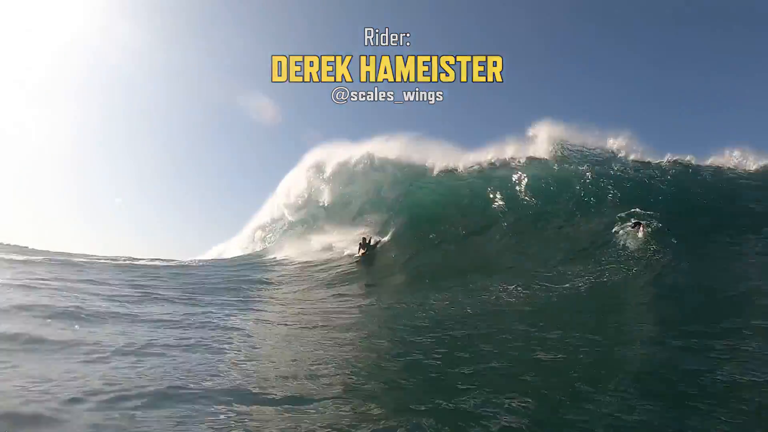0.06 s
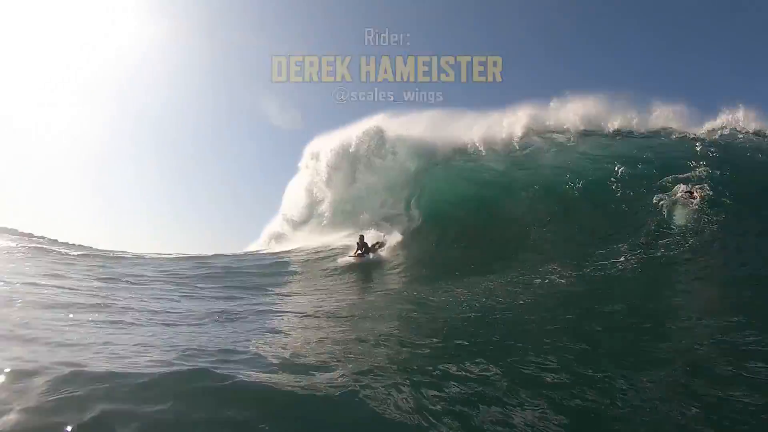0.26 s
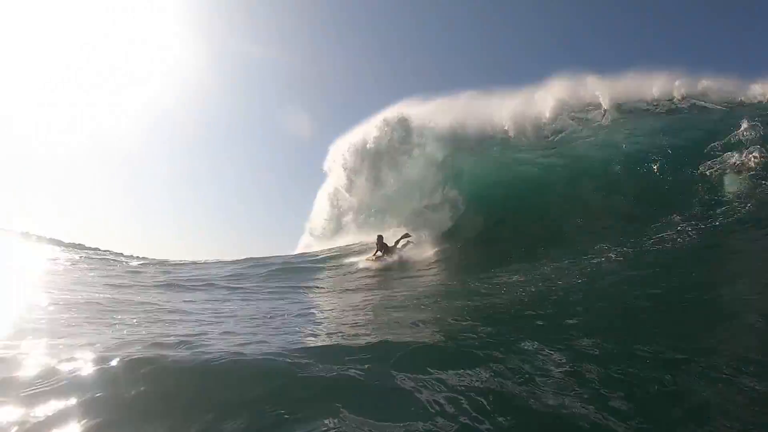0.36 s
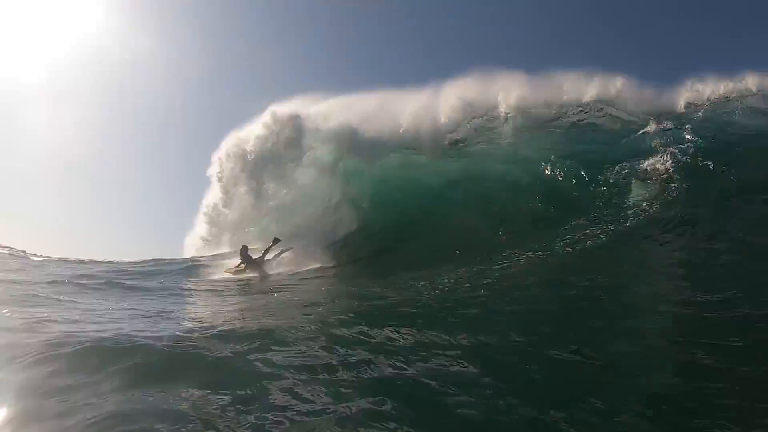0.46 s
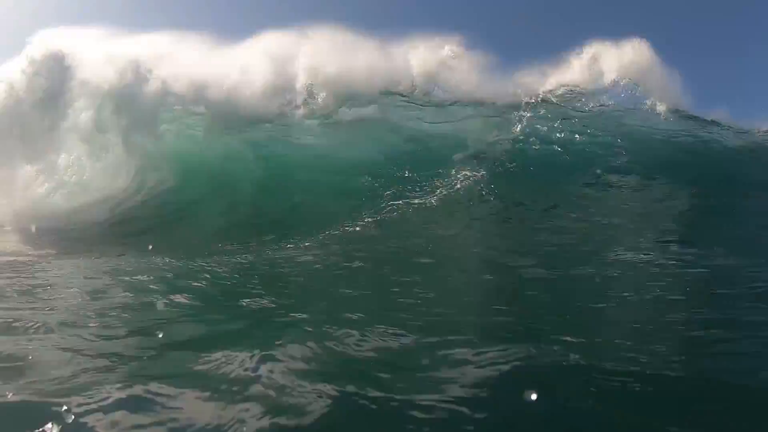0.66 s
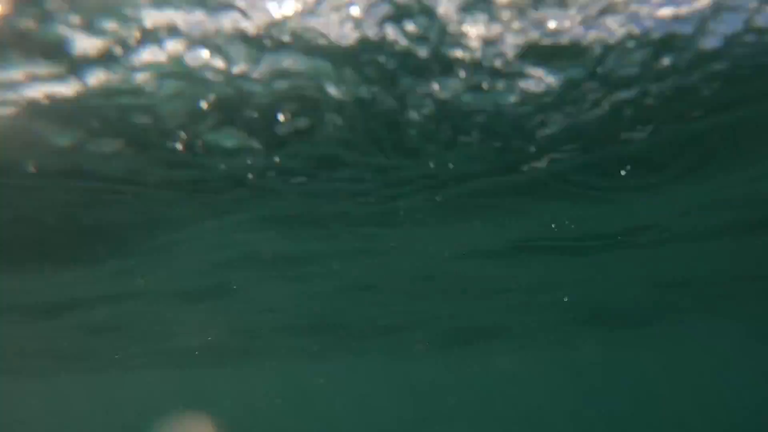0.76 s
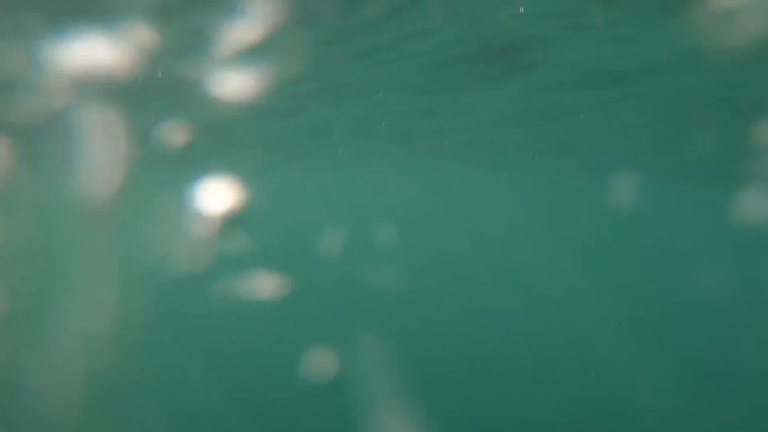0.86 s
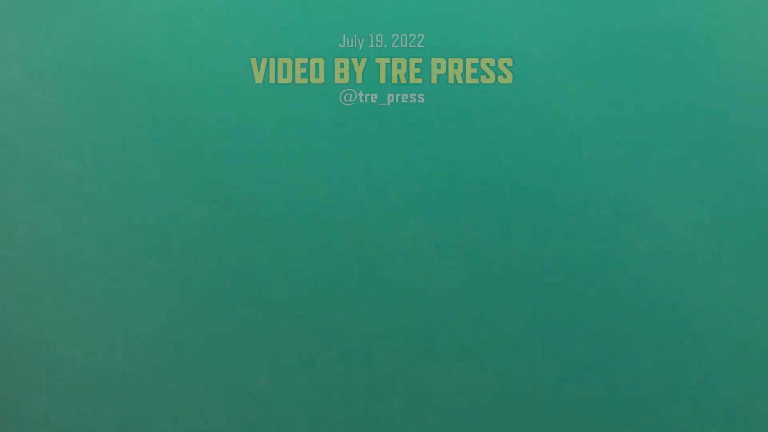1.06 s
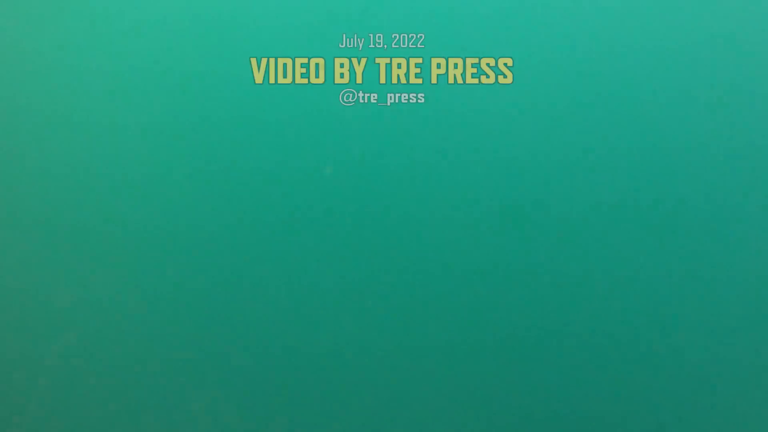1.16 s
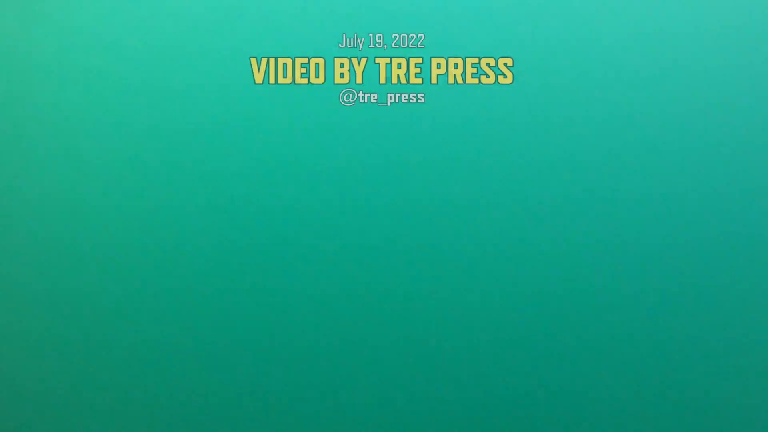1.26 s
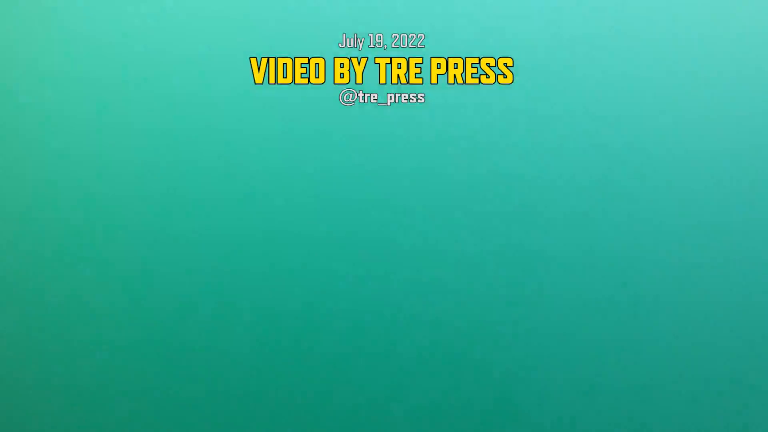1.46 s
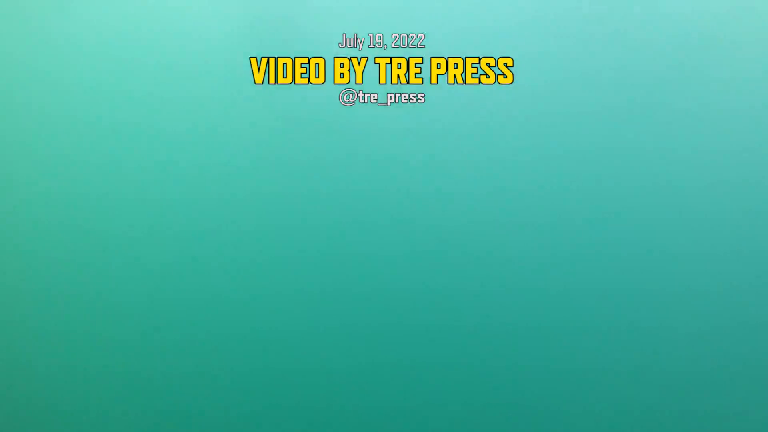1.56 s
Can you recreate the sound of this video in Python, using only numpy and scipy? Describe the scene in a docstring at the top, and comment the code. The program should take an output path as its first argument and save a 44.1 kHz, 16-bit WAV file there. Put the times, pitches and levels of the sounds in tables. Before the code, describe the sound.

Surf washes softly toward a microphone bobbing in the sea, until a close splash takes it underwater. Gurgling, fizzing bubbles and a low throbbing follow, fading to a dull rumble with a few small ticks.

```python
"""First a wave breaks some way off, heard from a waterproof camera at the surface that water rocks.
A nearer wash swells, its foam and hollow resonances sounding together. At 0.8 s the camera plunges:
spray sets the case ringing and the water closes with a slap. Entrained air then streams past as
oscillating bubbles, while shed eddies throb in a low tone that rises and falls.
A last glug follows at 1.3 s, then a muffled rumble with a few ticks of small bubbles."""
import sys
import numpy as np
from scipy import signal
from scipy.fft import rfft, irfft
from scipy.io import wavfile
from scipy.ndimage import uniform_filter1d

SR = 44100
rng = np.random.default_rng(int(sys.argv[2]) if len(sys.argv) > 2 else 0)


def output_pcm(signal):
    """Save a mono or channel-first signal as 16-bit PCM at the path in sys.argv[1].

    Samples are clipped to [-1, 1] before scaling.
    """
    pcm = np.clip(np.atleast_2d(signal).T, -1, 1) * 32767
    wavfile.write(sys.argv[1], SR, np.round(pcm).astype(np.int16))


N = 70560
T = np.arange(N) / SR


def undb(db):
    """Amplitude ratio of a level in decibels."""
    return 10 ** (np.asarray(db) / 20)


def unit(x):
    """Normalisation to rms 1."""
    return x / np.sqrt(np.mean(x ** 2))


def curve(table, column=1):
    """Linear interpolation of one column in time."""
    rows = np.array(table)
    return np.interp(T, rows[:, 0], rows[:, column])


def during(table):
    """A time window over a table's span, with 20 ms fades outside."""
    return np.clip(1 + np.minimum(T - table[0][0], table[-1][0] - T) / .02, 0, 1)


def colour(x, spectrum):
    """Spectral shaping by rows of f/Hz, level/dB; rms 1."""
    hz, db = np.array(spectrum).T
    f = np.maximum(np.fft.rfftfreq(N, 1 / SR), 1)
    skirts = np.minimum(f / hz[0], 1) ** 2 * np.minimum(hz[-1] / f, 1) ** 4
    gain = undb(np.interp(np.log(f), np.log(hz), db))
    return unit(irfft(rfft(x) * skirts * gain, N))


def walk(rate):
    """Random modulation: values held 1 / rate s and smoothed twice; rms 1."""
    hold = int(SR / rate)
    steps = np.repeat(rng.standard_normal(N // hold + 1), hold)
    return unit(uniform_filter1d(uniform_filter1d(steps, hold), hold)[:N])


def add(out, start, sound):
    """Superposition of a sound from a start time in seconds."""
    i = int(np.clip(start * SR, 0, N - 1))
    out[i:i + len(sound)] += sound[:N - i]


def ring(hz, t60, attack_s, glide=0):
    """A damped oscillator whose frequency climbs by the fraction glide."""
    t = np.arange(int(t60 * SR) + 2) / SR
    envelope = (1 - np.exp(-t / attack_s)) * np.exp(-np.log(1000) * t / t60)
    return envelope * np.sin(2 * np.pi * hz * t * (1 + glide * t / t60 / 2))


def resonance(hz, width_hz):
    """A resonator driven by turbulence gives narrow-band noise; rms 1."""
    phase = 2 * np.pi * np.cumsum(hz * np.ones(N)) / SR
    return unit(walk(2 * width_hz) * np.sin(phase) + walk(2 * width_hz) * np.cos(phase))


def bubbles(per_s, low_hz, high_hz, cycles, scatter_db):
    """Bubbles pulsate at frequencies set by their size, many weakly and a few strongly; rms 1."""
    out = np.zeros(N)
    for when, size, strength, life in rng.random((12000, 4))[:int(per_s * N / SR)]:
        hz = low_hz * (high_hz / low_hz) ** size
        db = -scatter_db * np.log(max(strength, .02))
        blip = ring(hz, t60=cycles * (.5 + life) / hz, attack_s=.7 / hz, glide=.38)
        add(out, when * N / SR, hz * undb(db) * blip)  # weighting by hz flattens the spectrum
    return unit(out)


# Spectra of the spray and the slap: f/Hz, relative level/dB
SPRAY_SPECTRUM = [(100, 2.5), (320, 6), (600, -14), (900, -9), (1200, 6), (1700, -7), (2000, -6.5),
                  (2350, -12.5), (3200, -18.5), (4600, -11.5), (6500, -17.5), (8300, -25.5), (10500, -53),
                  (13000, -35), (16000, -45)]
SLAP_SPECTRUM = [(300, -1.5), (1000, 5), (1700, 8.5), (2800, -3), (5000, -17), (9000, -34)]
# Modes of the case: f/Hz, bandwidth/Hz, relative level/dB
CASE_MODES = [(1208, 50, -11), (2283, 60, -17)]
def splash():
    """Impact excitation: spray drives the modes of the case until the water closes with a slap."""
    entry_s, slap_rise_s = .807, .0011
    spray_start_s, spray_fade_s = .776, .017

    def swell(rise_db_s, fall_db_s=911):
        """Exponential growth up to the entry, then decay."""
        return undb(-12.5 + np.minimum(rise_db_s * (T - entry_s), fall_db_s * (entry_s - T)))

    drops = bubbles(6000, 112.5, 12800, cycles=6, scatter_db=2)
    spray = colour(drops + undb(.5) * rng.standard_normal(N), SPRAY_SPECTRUM)
    ringing = sum(undb(db) * resonance(hz, width) for hz, width, db in CASE_MODES)
    onset = np.clip((T - spray_start_s) / spray_fade_s, 0, 1)
    age = np.maximum(T - entry_s, 0) / slap_rise_s
    slap = colour(rng.standard_normal(N), SLAP_SPECTRUM) * age * np.exp(1 - age)
    return (spray * swell(760) + ringing * swell(453)) * onset + undb(-8.5) * slap


# Envelopes of the bubble cloud: t/s, gurgle level/dB, fizz level/dB
CLOUD_LEVELS = [(.8, -24.5, -63), (.835, -27, -68), (.86, -21, -37.5), (.895, -24, -39), (.92, -17.5, -34),
                (.96, -19.5, -35.5), (.99, -23.5, -36), (1.03, -28, -41.5), (1.075, -29.5, -51.5),
                (1.105, -23.5, -46.5), (1.16, -34.5, -47), (1.23, -33, -48), (1.3, -37.5, -61),
                (1.39, -43, -72.5), (1.44, -41, -74), (1.52, -49, -61), (1.6, -48.5, -72.5)]
# Spectra of its large and small bubbles: f/Hz, relative level/dB
GURGLE_SPECTRUM = [(150, -11.5), (260, -0.5), (430, 2.5), (700, 2.5), (950, -5), (1200, 0), (1450, -7.5),
                   (1700, -3.5), (2050, -26.5), (2800, -21.5), (3600, -36), (6000, -66)]
FIZZ_SPECTRUM = [(1800, 8.5), (2700, 3), (3400, -6), (4400, 5), (5200, 0.5), (6100, 6.5), (7000, -3.5),
                 (8400, -8), (10500, -38), (13000, -30), (16000, -33)]
def cloud():
    """Air entrainment: large bubbles gurgle and small ones fizz, in shared spurts."""
    large = bubbles(2700, 188.7, 3386, cycles=16.1, scatter_db=2)
    small = bubbles(1800, 2000, 14000, cycles=20, scatter_db=3.5)
    hiss = undb(2) * rng.standard_normal(N)
    gurgle = colour(large, GURGLE_SPECTRUM) * undb(curve(CLOUD_LEVELS))
    fizz = colour(small + hiss, FIZZ_SPECTRUM) * undb(curve(CLOUD_LEVELS, column=2))
    spurts = undb(1.35 * walk(80))
    return (gurgle + fizz) * spurts * during(CLOUD_LEVELS)


# Knocks of water and trapped air: t/s, f/Hz, level/dB, T60/s
AIR_POCKETS = [(0.209, 41.7, -14.5, 0.16), (.796, 158, -10.5, 0.086), (.81, 166.6, -6.5, 0.08),
               (0.81, 50, -2.5, 0.078), (.909, 352, -12, 0.083), (0.92, 205, -10.5, 0.059),
               (0.92, 85, -4.5, 0.057), (0.954, 66.7, -3, 0.075), (1.01, 63.6, -8.5, 0.11),
               (1.265, 204.6, -20, 0.096), (1.3, 157, -5.5, 0.059)]
def glugs():
    """Damped free oscillation: large air pockets and slaps of water boom briefly."""
    out = np.zeros(N)
    for start, hz, db, t60 in AIR_POCKETS:
        add(out, start, np.sqrt(2) * undb(db) * ring(hz, t60, attack_s=.0031))
    return out


# Tone of the flow past the case: t/s, f/Hz, level/dB
EDDY_TONE = [(.95, 92.3, -42), (1.03, 99.6, -19.5), (1.08, 114.5, -13), (1.105, 168.3, -20),
             (1.14, 201.1, -19), (1.19, 155.6, -18.5), (1.23, 121.6, -12), (1.265, 97.5, -18.5),
             (1.29, 85, -34)]
def throb():
    """Vortex shedding: eddies leave the diving case faster, then slower."""
    hz = curve(EDDY_TONE) * (1 + .028 * walk(70))
    tone = np.sqrt(2) * np.sin(2 * np.pi * np.cumsum(hz) / SR)
    flicker_db = 2 * walk(70.48)
    return tone * undb(curve(EDDY_TONE, column=2) + flicker_db) * during(EDDY_TONE)


# Single bubbles on the case: t/s, f/Hz, level before the wall/dB, T60/s
BURSTS = [(.852, 1324, -13, .016), (.854, 7790, -16, 0.0053), (0.8754, 5910, -23, 0.015),
          (.8837, 5980, -23.5, 0.017), (.956, 1530, -18, 0.028), (1.001, 1610, -12.5, 0.015),
          (1.045, 1740, -11.5, 0.0085), (1.051, 4360, -32.5, 0.03), (1.104, 4170, -32, 0.018),
          (1.13, 1042, -21, 0.055), (1.174, 503, -26.5, 0.1), (1.33, 5780, -46, 0.029),
          (1.389, 1710, -42, 0.049), (1.448, 1740, -41.5, 0.046), (1.461, 2900, -42.5, 0.021),
          (1.462, 4650, -43.5, 0.013), (1.4934, 4420, -35, .003), (1.5156, 5750, -26, 0.0029),
          (1.525, 6660, -27.5, 0.0032), (1.557, 2670, -39, 0.0076), (1.57, 2350, -42, 0.0093)]
def pops():
    """Transients through a wall: bubbles burst with a crack and a ring, low-passed by the case."""
    crack_db, crack_decay_s, wall_cutoff_hz = -20.5, .0037, 9800
    out = np.zeros(N)
    crackle = colour(rng.standard_normal(N), FIZZ_SPECTRUM)
    for start, hz, db, t60 in BURSTS:
        age = np.maximum(T - start, 0)
        out += undb(db + crack_db) * crackle * (T > start) * np.exp(-age / crack_decay_s)
        add(out, start, np.sqrt(2) * undb(db) * ring(hz, t60, attack_s=.00079, glide=.05))
    return signal.sosfilt(signal.butter(10, wall_cutoff_hz, fs=SR, output="sos"), out)


# Spectrum of the wake: f/Hz, relative level/dB
WAKE_SPECTRUM = [(70, -8), (120, 5.5), (190, 1), (260, -23), (400, -32.5)]
# Its envelope: t/s, level/dB
WAKE_LEVEL = [(.8, -23), (.88, -31.5), (.95, -20), (1.03, -30.5), (1.14, -19), (1.25, -30.5), (1.36, -38),
              (1.48, -41.5), (1.6, -41.5)]
def churn():
    """Bubble resonance falls with size: big bubbles tumbling in the wake sound low."""
    wake = colour(bubbles(350, 80, 350, cycles=8.2, scatter_db=.5), WAKE_SPECTRUM)
    return wake * undb(curve(WAKE_LEVEL)) * during(WAKE_LEVEL)


# Swell of the wash: t/s, level/dB, hollow resonance f/Hz
WASH_SWELL = [(0, -42.5, 620), (.07, -60.5, 680), (.19, -45.5, 760), (.26, -53.5, 720), (.37, -44.5, 700),
              (.44, -36.5, 735), (.52, -32.5, 785), (.575, -30, 835), (.62, -39.5, 850), (.7, -58, 830)]
# Spectrum of its foam: f/Hz, relative level/dB
FOAM_SPECTRUM = [(200, -8), (420, -8.5), (570, 0.5), (720, -7.5), (1150, -5), (1450, -14), (1700, -4.5),
                 (2100, -31), (6000, -35), (9000, -52)]
# Envelope of its lower resonance: t/s, level/dB
TROUGH_ENVELOPE = [(.2, -50), (.32, -43.5), (.4, -39.5), (.49, -43.5), (.6, -44), (.66, -43.5)]
def wash():
    """Resonance in nearer water: a hollow band climbs amid foam, above a steady lower one."""
    hollow = undb(-.5) * resonance(curve(WASH_SWELL, column=2), width_hz=85)
    foam = undb(-1) * colour(bubbles(4000, 252, 7830, cycles=11.8, scatter_db=.5), FOAM_SPECTRUM)
    trough = resonance(590.7, width_hz=76) * undb(curve(TROUGH_ENVELOPE)) * during(TROUGH_ENVELOPE)
    return (hollow + foam) * undb(curve(WASH_SWELL)) * during(WASH_SWELL) + trough


# Spectrum of the far breaker: f/Hz, relative level/dB
SURF_SPECTRUM = [(120, -28), (180, -4), (260, 1.5), (450, -5), (660, -8), (800, -5), (1230, -10),
                 (1750, -8.5), (2100, -16), (3000, -25), (4400, -22), (5400, -21.5), (6200, -27),
                 (7500, -29), (9000, -42.5), (11700, -69)]
# Its envelope: t/s, level/dB
SURF_ENVELOPE = [(0, -42), (.04, -44.5), (.08, -47), (.2, -44.5), (.3, -49), (.4, -45), (.55, -39.5),
                 (.68, -42), (.8, -39.5), (.9, -48)]
def surf():
    """Incoherent sources sum to a far roar with some spatter; a high case mode adds a sheen."""
    spatter = undb(-7) * bubbles(1500, 312, 9100, cycles=7, scatter_db=2.5)
    roar = colour(rng.standard_normal(N) + spatter, SURF_SPECTRUM)
    sheen = undb(-17) * resonance(6060, width_hz=390)
    flicker_db = .51 * walk(18.8)
    return (roar + sheen) * undb(curve(SURF_ENVELOPE) + flicker_db) * during(SURF_ENVELOPE)


# Spectrum of the rocking case: f/Hz, relative level/dB
ROCKING_SPECTRUM = [(12, -33), (28, 1), (52, 1), (80, -7), (130, -18.5), (220, -17), (400, -35)]
# Its envelope: t/s, level/dB
ROCKING_LEVEL = [(0, -29.5), (.16, -33.5), (.3, -28.5), (.45, -29.5), (.58, -26), (.68, -28), (.77, -34),
                 (.89, -34), (.95, -20), (1.07, -27), (1.16, -11.5), (1.26, -30), (1.36, -26),
                 (1.48, -37.5), (1.6, -26)]
def rumble():
    """Forced vibration: water pushes the case about at low frequencies."""
    return colour(rng.standard_normal(N), ROCKING_SPECTRUM) * undb(curve(ROCKING_LEVEL))


def scene():
    """Superposition of the surface, the plunge and the water below, in one channel."""
    return (surf() + wash() + rumble() + splash() + cloud() + churn() + throb() + glugs() + pops())[None]


def record(dry):
    """Saturation and band limiting: the camera clips at full scale and cuts the top."""
    lowpass = signal.ellip(8, .2, 70, 15800, fs=SR, output="sos")
    return signal.sosfilt(lowpass, np.clip(dry, -1, 1))


dry = scene()
out = record(dry)
output_pcm(out)
```